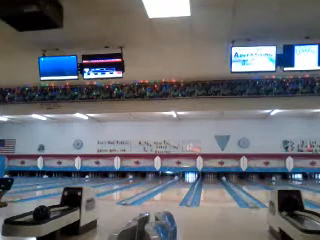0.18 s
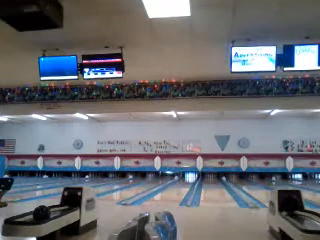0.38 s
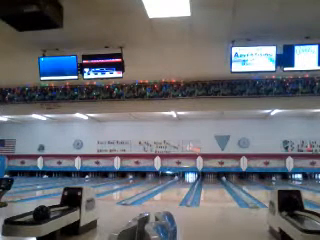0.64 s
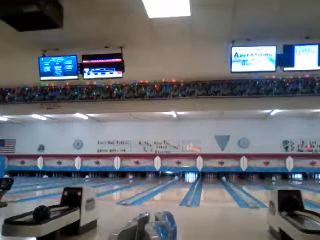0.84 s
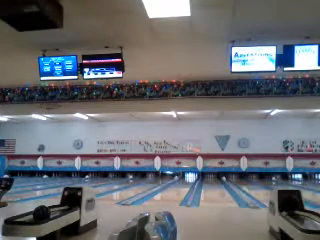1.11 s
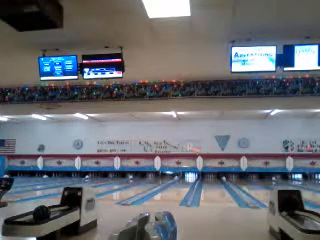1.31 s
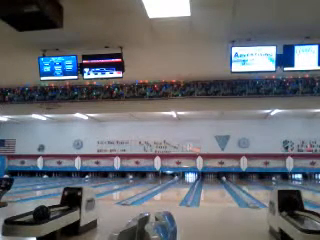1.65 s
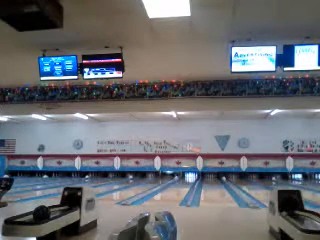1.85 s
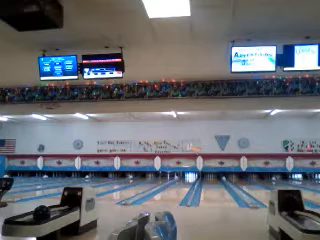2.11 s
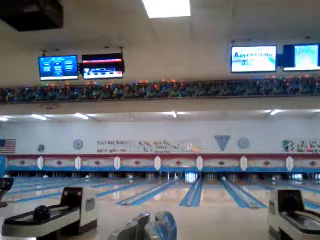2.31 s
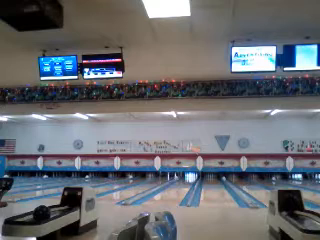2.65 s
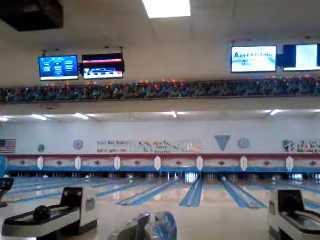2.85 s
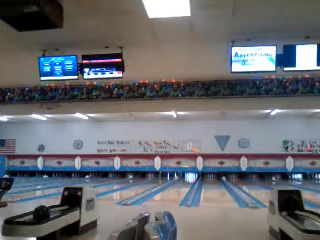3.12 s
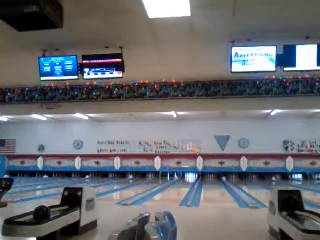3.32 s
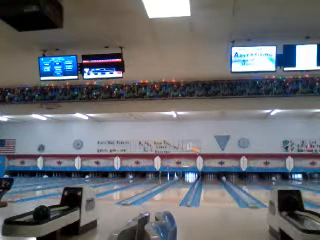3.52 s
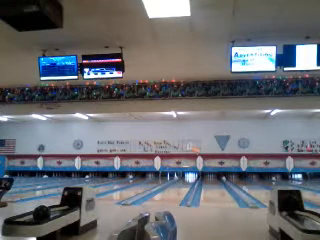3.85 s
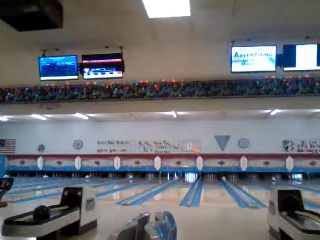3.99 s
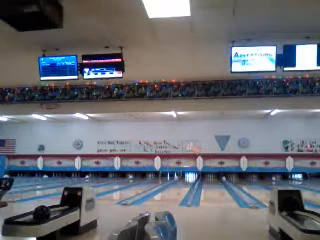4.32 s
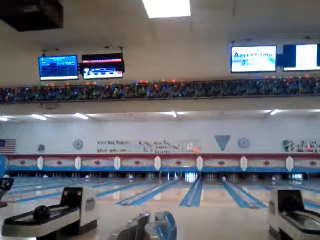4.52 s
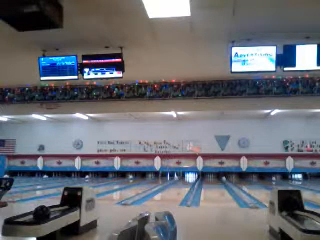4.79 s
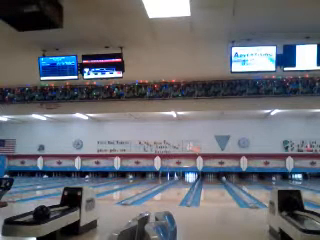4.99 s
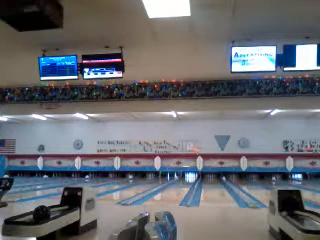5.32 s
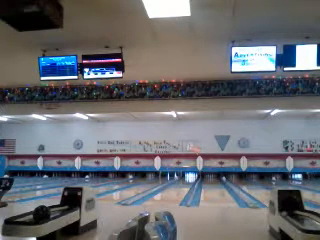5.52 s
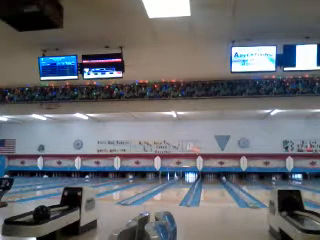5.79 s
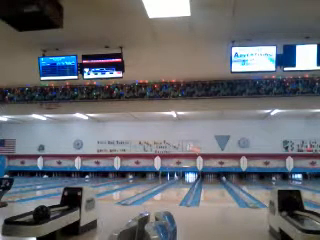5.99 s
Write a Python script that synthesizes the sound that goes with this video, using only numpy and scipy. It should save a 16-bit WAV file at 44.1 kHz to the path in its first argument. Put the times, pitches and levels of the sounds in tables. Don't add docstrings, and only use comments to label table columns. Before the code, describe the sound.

Low bowling-hall rumble with faint far pin knocks, a ball booming onto boards, then a loud crack of pins scattering, thudding, and another ball landing.

```python
import sys
import numpy as np
from scipy import signal
from scipy.fft import rfft, irfft, next_fast_len
from scipy.io import wavfile
from scipy.ndimage import uniform_filter1d

SR = 44100
rng = np.random.default_rng(int(sys.argv[2]) if len(sys.argv) > 2 else 0)


def store_wav(level_fs):
    pcm = np.round(np.clip(np.atleast_2d(level_fs), -1, 1) * 32767)
    wavfile.write(sys.argv[1], SR, pcm.T.astype(np.int16))


def boost_factor(decibels):
    exponent = np.asarray(decibels, float) / 20
    return 10 ** exponent


N = 271288

# freq_hz, density_db
RUMBLE_SPECTRUM = [(15, -69), (25, -43), (54, -21), (131, -21.5), (267, -3), (306, -3), (391, -0.5),
                   (426, -5), (473, 0), (682, -4), (731, -5), (1600, -22), (2080, -42), (3520, -120)]
# freq_hz, density_db
HISS_SPECTRUM = [(590, -28), (1000, -6), (1220, -4), (1490, -4), (2450, -9), (2700, -13.5), (3230, -12.5),
                 (5000, -14.5), (8000, -120)]
# time_s, level_db
HALL_ACTIVITY = [
    (0, 0),
    (.5, 1),
    (1.0, 0.5),
    (1.7, .5),
    (2.5, 0),
    (3.2, -0.5),
    (4.6, 0),
    (5.3, 0),
    (6.15, 1),
]
# freq_hz, t60_s
HALL_DECAY = [(100, 0.17), (400, 0.86), (700, 0.12), (1200, 0.64), (3500, 0.27)]
# start_s, peak_db, belly_hz, t60_s
FAR_KNOCKS = [(0.108, -18.5, 780, 0.014), (0.144, -22, 478, 0.027), (0.279, -28, 500, 0.016),
              (0.706, -19, 575, 0.015), (0.731, -20, 504, .013), (1.589, -27.5, 562, 0.032),
              (1.75, -25, 550, 0.021), (2.3, -24.5, 612, 0.017), (3.153, -26, 500, 0.024),
              (4.998, -30.5, 676, 0.018), (5.414, -19, 700, 0.033), (5.419, -13.5, 560, 0.026),
              (5.439, -18.5, 637, 0.012), (5.474, -29, 657, .02), (5.489, -22, 500, 0.0093),
              (6.069, -27, 300, .04), (6.108, -25, 327, 0.034)]
# start_s, level_db, rise_s, fade_db_per_s, rattle_db
FAR_FLURRIES = [
    (.04, -33.5, 0.085, 90.5, -22),
    (5.43, -33, .04, 70, -15),
    (6.0, -39, 0.13, 18, -11.5),
]
# start_s, peak_db, boom_hz, shell_hz, shell_db
BALL_LANDINGS = [(1.079, -15.5, 375, 1530, -8.5), (1.082, -6.5, 302, 2047, -12), (1.09, -21, 234, 2270, -7),
                 (1.101, -9, 270, 1610, -28), (1.164, -13.5, 266, 2200, -22.5),
                 (1.209, -17.5, 306, 2000, -23), (1.264, -24.5, 315, 1710, -24),
                 (1.581, -29.5, 230, 1620, -23.5), (2.047, -33, 353, 1510, -14),
                 (2.799, -41, 326, 2210, -5.5), (5.739, -18, 330, 1820, -15.5), (5.75, -15, 310, 1500, -24),
                 (5.783, -16.5, 326, 1470, -30), (5.809, -18, 330, 1660, -27.5),
                 (5.835, -23, 320, 1370, -24)]
# start_s, peak_db, boom_hz, shell_hz, shell_db
BALL_SKIDS = [
    (1.093, -17.5, 504, 2590, -15),
    (1.116, -28, 598, 2580, -29),
    (1.134, -24.5, 410, 3330, -19),
    (2.809, -38, 575, 2670, -11),
    (5.727, -29, 401, 3080, -17),
    (5.733, -20, 511, 3000, -17),
    (5.741, -16, 452, 3145, -22),
]
# start_s, level_db, rise_s, fade_db_per_s, rattle_db
BALL_ROLL_OFFS = [
    (1.084, -22, .008, 67.5, -11),
    (2.797, -47, 0.0055, 90, 6),
    (5.726, -31, 0.014, 100, -5),
]
# freq_hz, width_hz, level_db
LANE_MODES = [(70, 29, -19), (186, 61, -8), (270, 90, 2), (370, 110, 3)]
# freq_hz, width_hz, level_db
DECK_MODES = [(79, 31, -24), (177, 34, -4), (280, 78, 2.5), (390, 91, 10)]
# freq_hz, width_hz, level_db
BELLY_MODES = [(507, 90, -4.5), (691, 92, 2), (871, 76, 0.5), (1006, 210, -3.5)]
# freq_hz, width_hz, level_db
NECK_MODES = [(1165, 23, -2), (1217.3, 18, -3), (1221, 150, -7.5)]
# freq_hz, width_hz, level_db
RATTLE_MODES = [(1420, 390, -0.5), (2200, 600, -3.5), (2450, 130, -3), (3380, 600, -6), (4260, 780, -10)]
# time_s, level_db
TUMBLE_EFFORT = [
    (3.282, -8),
    (3.31, -19.5),
    (3.4, -23.5),
    (3.48, -22),
    (3.62, -26.5),
    (3.76, -24),
    (3.93, -30.5),
    (4.03, -30),
    (4.45, -41.5),
]
# level_db, drift_db_per_s, joins_after_s, clumped_share
TUMBLE_LAYERS = [
    (-7.5, 9, 0.085, 0.24),
    (-1, 1, 0.012, 0.34),
    (2, -20.5, .08, .2),
    (-18, 5, .09, .6),
]
# start_s, peak_db, belly_hz, t60_s
PLOUGH_HITS = [
    (3.272, 4.5, 667, 0.021),
    (3.28, -4, 718, 0.021),
    (3.297, -10, 1022, .037),
    (3.305, -22.5, 1606, .04),
    (3.311, -14.5, 620, .02),
    (3.334, -7, 676, 0.029),
]
# start_s, peak_db, belly_hz, t60_s, extra_neck_db
SCATTER_HITS = [(3.362, -9, 695, 0.02, 5), (3.374, -12, 790, 0.027, 10), (3.389, -7.5, 868, .018, -6.5),
                (3.409, -16, 800, 0.029, 7), (3.425, -16, 1014, 0.032, 6), (3.439, -12, 390, 0.061, 3.5),
                (3.457, -8, 611, 0.048, -2), (3.482, -8.5, 470, 0.027, 8), (3.516, -8, 476, 0.017, 0),
                (3.524, -8, 420, .025, -10), (3.569, -13.5, 707, 0.01, 8), (3.594, -7.5, 417, .024, 0),
                (3.659, -15, 399, .03, -3.5), (3.682, -17, 390, .02, -4), (3.703, -11.5, 530, 0.022, 1.5),
                (3.725, -15.5, 525, 0.053, 5.5), (3.739, -16.5, 527, 0.027, 0),
                (3.764, -16.5, 600, 0.031, -5.5), (3.808, -9.5, 470, 0.022, -1.5)]
# start_s, peak_db, belly_hz, t60_s
SETTLE_THUDS = [(3.848, -19.5, 390, 0.044), (3.894, -7.5, 374, 0.021), (3.968, -10, 450, .02),
                (4.008, -7, 420, .014), (4.021, -13, 558, 0.039), (4.034, -15, 546, 0.017),
                (4.089, -17, 455, 0.018), (4.111, -17.5, 554, 0.032), (4.129, -17, 257, 0.03),
                (4.167, -21, 263, 0.03), (4.2, -11, 677, 0.033), (4.244, -22.5, 1050, 0.029)]
# freq_hz, gain_db
CONVERTER_EDGE = [(3150, -0.5), (3500, -7.5), (4000, -19.5), (4300, -28.5), (4550, -46.5), (4800, -120)]


def unit(x):
    return x / np.sqrt(np.mean(x ** 2) + 1e-20)


def along(points, hz):
    f, v = np.transpose(points)
    return np.interp(np.log(hz + 1), np.log(f + 1), v)


def curve(points):
    s, value = np.transpose(points)
    return np.interp(np.arange(N) / SR, s, value)


def filtered(x, response):
    m = next_fast_len(N + SR // 2)
    return irfft(rfft(x, m) * response(np.fft.rfftfreq(m, 1 / SR)), m)[..., :N]


def body(modes):
    def response(f):
        total = 0
        for k, (centre, width, db) in enumerate(modes):
            damping = 1j * f * width
            total = total + (-1) ** k * boost_factor(db) * damping / (centre ** 2 - f ** 2 + damping)
        return total
    return response


def taps(per_s, spread_db):
    hit = rng.random(N) < per_s / SR
    size, sign = rng.exponential(size=N), rng.standard_normal(N)
    return hit * sign * boost_factor(spread_db * size)


def struck(modes, per_s, spread_db, dull_hz):
    resonate = body(modes)
    blows = taps(per_s, spread_db)
    return unit(filtered(blows, lambda f: resonate(f) / (1 + 1j * f / dull_hz) ** 3))


def ring(hz, t60, t, rise=0.00085):
    swell = (1 - np.exp(-t / rise)) ** 2
    return np.sin(2 * np.pi * hz * t) * boost_factor(-60 * t / t60) * swell


def crack(t, t60):
    swell = (1 - np.exp(-t / 0.0038)) ** 2
    burst = rng.standard_normal(len(t)) * boost_factor(-60 * t / t60) * swell
    return signal.sosfilt(signal.butter(2, [1400, 4200], "band", fs=SR, output="sos"), burst)


def add(track, s, sound):
    at = round(s * SR)
    track[at:at + len(sound)] += sound[:len(track) - at]


def echoed(sound, wet_db):
    hz, t, z = signal.stft(rng.standard_normal(SR // 2), SR, nperseg=256)
    decay = boost_factor(-60 * t / along(HALL_DECAY, hz)[:, None])
    tail = signal.istft(z * decay, SR, nperseg=256)[1]
    tail[:SR // 200] = 0
    out = boost_factor(wet_db) * signal.fftconvolve(sound, tail / np.linalg.norm(tail))
    add(out, 0, sound)
    return out


def rush(spectrum, patchy_db):
    z = signal.stft(rng.standard_normal(N + 512), nperseg=512)[2]
    patches = uniform_filter1d(rng.standard_normal(z.shape), size=4, axis=0)
    patches = uniform_filter1d(patches, size=8, axis=1)
    x = signal.istft(z * boost_factor(patchy_db * unit(patches)), nperseg=512)[1][:N]
    return unit(filtered(x, lambda hz: boost_factor(along(spectrum, hz))))


def hall():
    busy_db = curve(HALL_ACTIVITY)
    knocks = struck(DECK_MODES[2:] + BELLY_MODES, 150, 3.1, dull_hz=800)
    rumble = boost_factor(-38 + busy_db) * (rush(RUMBLE_SPECTRUM, patchy_db=1.5) + 0.11 * knocks)
    hiss = boost_factor(-52 + 1.2 * busy_db) * rush(HISS_SPECTRUM, patchy_db=2.5)
    return rumble + hiss


def pins(contacts, neck_db, crack_db, crack_s, wet_db):
    out, t = np.zeros(N), np.arange(SR // 5) / SR
    for s, db, hz, t60, *free_db in contacts:
        belly = -ring(hz, t60, t)
        neck = 0
        for f, width, gain_db in NECK_MODES:
            uneven_db = gain_db + rng.normal(0, 1.6)
            neck = neck + boost_factor(uneven_db) * ring(f, 2.7 / width, t, rise=0.0042)
        knock = belly + boost_factor(neck_db + sum(free_db)) * neck + boost_factor(crack_db) * crack(t, crack_s)
        add(out, s + 0.001, echoed(boost_factor(db + 3) * knock, wet_db))
    return out


def far_lanes():
    return pins(FAR_KNOCKS, neck_db=-33, crack_db=-29, crack_s=0.03, wet_db=0)


def balls():
    out, t = np.zeros(N), np.arange(SR // 5) / SR
    for contacts, scrape_db, boom_t60 in ((BALL_LANDINGS, -17, 0.022), (BALL_SKIDS, -8, 0.035)):
        for s, db, boom_hz, shell_hz, shell_db in contacts:
            boom = ring(boom_hz, boom_t60, t, rise=0.0016)
            boom += 1.04 * ring(2.315 * boom_hz, 0.018, t)
            clack = ring(shell_hz, 0.015, t, rise=0.0026)
            scrape = echoed(crack(t, 0.055), wet_db=-4.5)
            add(out, s, boost_factor(db) * echoed(boom, wet_db=-7.5))
            add(out, s, boost_factor(db + shell_db + 22) * clack)
            add(out, s, boost_factor(db + shell_db + 20 + scrape_db) * scrape)
    return out


def flurries(events, mix_db, layers):
    out, t = np.zeros(N), np.arange(N) / SR
    for s, db, rise, fade, rattle_db in events:
        swell = np.clip((t - s) / rise, 0, 1)
        shape = swell * boost_factor(db - fade * np.maximum(t - s - rise, 0))
        out += shape * sum(boost_factor(share) * layer for share, layer in zip((*mix_db, rattle_db), layers))
    return out


def stirring(effort_db):
    kicks = np.zeros(N)
    for contacts, loss_db in ((PLOUGH_HITS + SCATTER_HITS, 0), (SETTLE_THUDS, -7.5)):
        for s, db, *_ in contacts:
            kicks[round(s * SR)] = boost_factor(db + loss_db - 15.5)
    clump_s = 0.032
    stir = signal.lfilter([1], [1, -np.exp(-1 / (clump_s * SR))], kicks)
    return np.minimum(stir / boost_factor(effort_db), 2)


def struck_pins_tumble(layers):
    t = np.arange(N) / SR
    since = t - TUMBLE_EFFORT[0][0]
    effort_db = curve(TUMBLE_EFFORT)
    stir = stirring(effort_db)
    out = np.zeros(N)
    for (db, drift, joins, share), layer in zip(TUMBLE_LAYERS, layers):
        entry = np.clip(since / joins, 0, 1) ** 2
        clumps = 1 + share * (stir - 1)
        out += entry * boost_factor(effort_db + db + drift * since) * clumps * layer
    return np.clip((TUMBLE_EFFORT[-1][0] - t) / 0.05, 0, 1) * out


def tumble():
    deck = struck(DECK_MODES, 900, 2.1, dull_hz=600)
    belly = struck(BELLY_MODES, 2000, 1.4, dull_hz=1100)
    neck = struck(NECK_MODES, 400, 2.2, dull_hz=900)
    rattle = struck(RATTLE_MODES, 4000, 1.8, dull_hz=6000)
    lane = struck(LANE_MODES, 900, 2.1, dull_hz=600)
    far = flurries(FAR_FLURRIES, (-7, 0, -16), (deck, belly, neck, rattle))
    roll = flurries(BALL_ROLL_OFFS, (0, -14, -23.5), (lane, belly, neck, rattle))
    return struck_pins_tumble((deck, belly, neck, rattle)) + far + roll


def pin_crash():
    strike = pins(PLOUGH_HITS[:1], neck_db=-24.5, crack_db=-11.5, crack_s=0.029, wet_db=-9.5)
    plough = pins(PLOUGH_HITS[1:], neck_db=-18.5, crack_db=-34.5, crack_s=0.03, wet_db=-8)
    scatter = pins(SCATTER_HITS, neck_db=-12.5, crack_db=-23, crack_s=0.028, wet_db=-8)
    settle = pins(SETTLE_THUDS, neck_db=-29.5, crack_db=-24, crack_s=0.039, wet_db=-3)
    return strike + plough + scatter + settle


def scene():
    return (hall() + far_lanes() + balls() + tumble() + pin_crash())[None]


def band_limit(x):
    return signal.sosfilt(signal.butter(12, 16500, fs=SR, output="sos"), x)


def record(dry):
    low_hz = 25
    narrow = filtered(dry, lambda hz: 1j * hz / (low_hz + 1j * hz) * boost_factor(along(CONVERTER_EDGE, hz)))
    flattened = np.clip(narrow, -0.71, 0.71)
    return band_limit(flattened)


dry = scene()
out = record(dry)
store_wav(out)
```